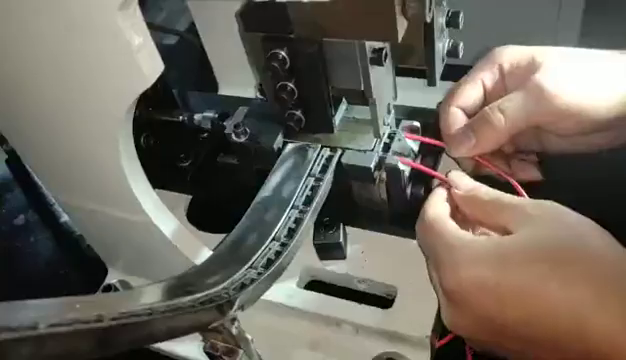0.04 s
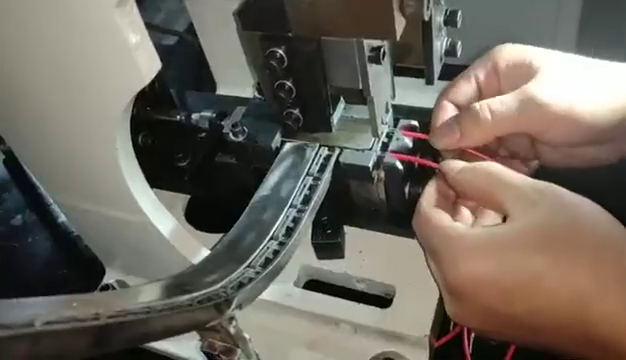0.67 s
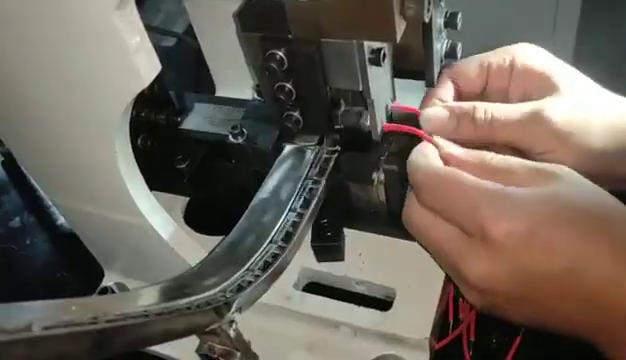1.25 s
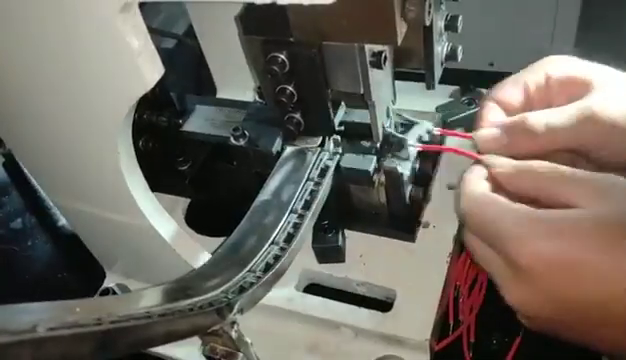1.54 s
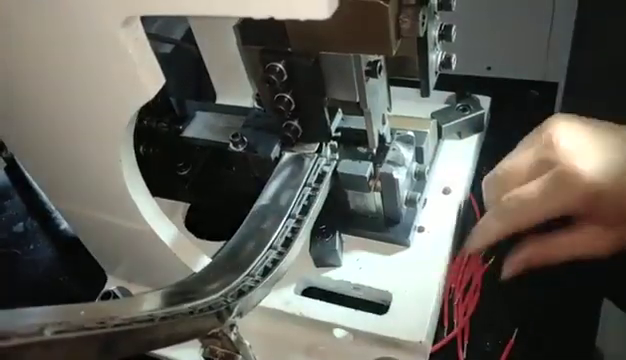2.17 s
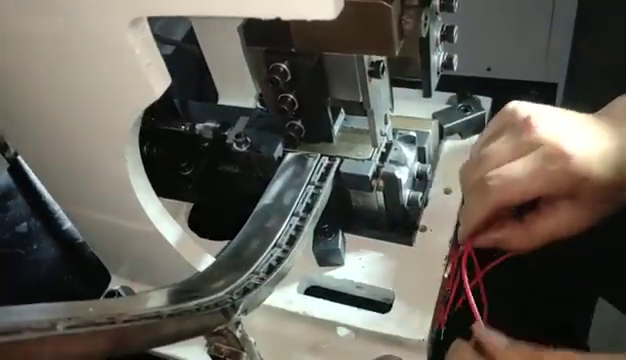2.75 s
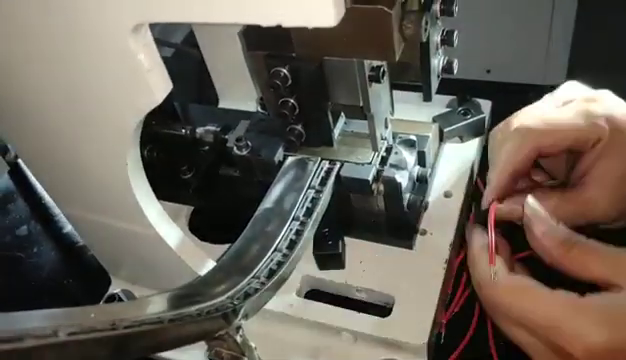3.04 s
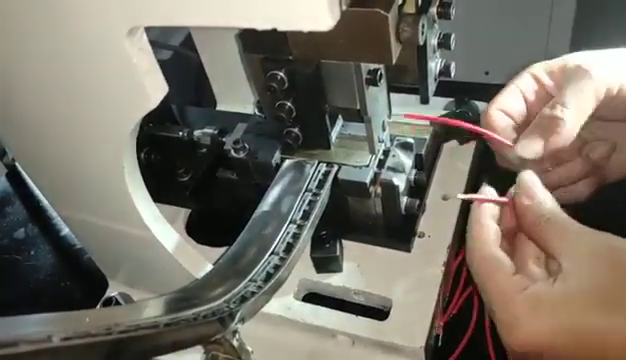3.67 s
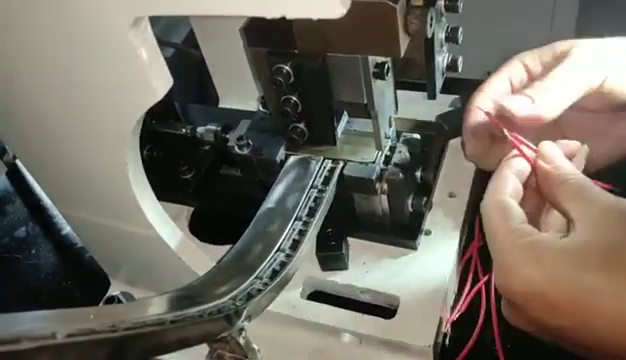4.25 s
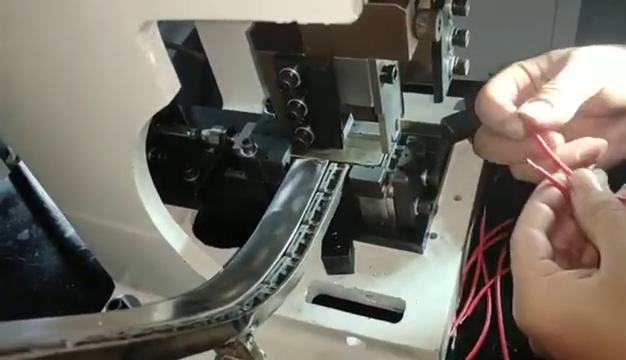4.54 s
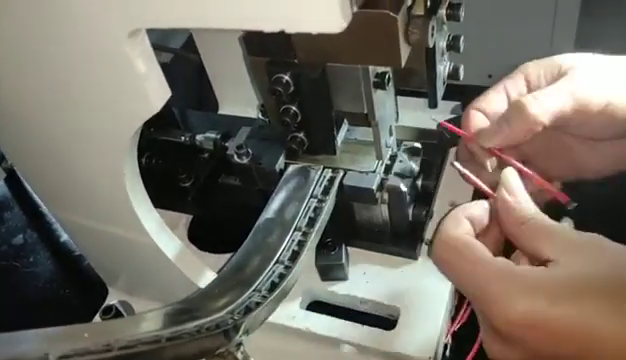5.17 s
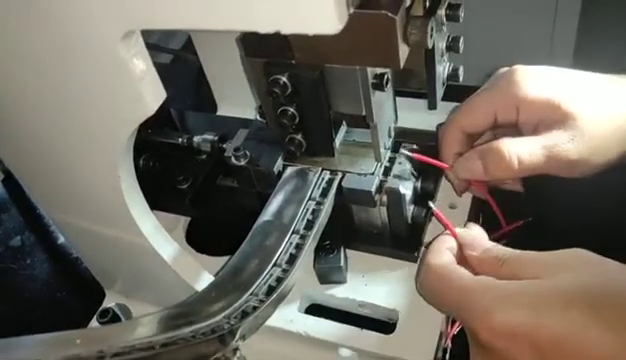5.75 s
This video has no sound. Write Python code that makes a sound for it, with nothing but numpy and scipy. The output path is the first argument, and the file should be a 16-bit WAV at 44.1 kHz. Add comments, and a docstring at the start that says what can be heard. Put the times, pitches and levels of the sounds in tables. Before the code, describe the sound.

Distant machines hum quietly in an echoing workshop. Close by, a little to the left, a wire crimping machine engages with a click and delivers one loud, ringing metal slam that chatters and settles. A smaller clack follows as the feed advances, and metal terminals scrape and jingle briefly along their guide. The rest is quiet: wires rub between fingers on the left, with a few light ticks.

```python
"""Crimping press in a workshop

Close by, left of the microphone, in a hard-walled shop: a clutch clicks in, the ram slams down and
chatters, steel slides rattle, the frame booms, a latch drops in. The feed clacks and drags a jingling
terminal strip. Then wires are handled, with faint ticks and swishes, over the hum of far machines."""
import sys
import numpy as np
from scipy import signal
from scipy.fft import rfft, irfft, next_fast_len
from scipy.io import wavfile
from scipy.ndimage import uniform_filter1d, minimum_filter1d

SR = 44100
rng = np.random.default_rng(int(sys.argv[2]) if len(sys.argv) > 2 else 0)


def store_pcm(level_fs):
    """Save levels as 16-bit WAV."""
    pcm = np.round(np.clip(level_fs, -1, 1) * 32767).astype(np.int16)
    wavfile.write(sys.argv[1], SR, np.atleast_2d(pcm).T)


N = 264732
TIME = np.arange(N) / SR

# stereo width at the microphone (frequency [Hz], side minus mid [dB])
STEREO_WIDTH = [(40, -2.5), (100, -17.5), (300, -9), (700, -3), (1500, -0.5), (3000, 0.5), (7500, -0.5)]
# decay of the room (frequency [Hz], t60 [s])
ROOM_DECAY = [(80, 2.7), (300, 0.61), (1000, 1.295), (3000, 0.72), (7500, 0.59)]
# wash of far machines (frequency [Hz], level [dB])
WASH_COLOUR = [(15, -45), (25, -6), (139, -2.5), (199, -5), (253, 0.5), (418, -5), (506, -12.5), (543, -12),
               (642, -7), (790, -19.5), (1050, -14), (2070, -23), (2330, -40.5), (2890, -42.5),
               (4130, -64.5), (7500, -26), (9750, -51.5), (16500, -120)]
# hums across the shop (frequency [Hz], level [dB], t60 [s])
SHOP_HUMS = [(260, -3.5, 0.97), (288, 1, 0.52), (350, -8.5, 0.36), (459, -2.5, 0.3), (503, -2.5, 0.58)]

# a wire slides through the fingers (time [s], hold [s], rub level [dB], hiss level [dB])
WIRE_RUBS = [(1.968, 0.1, -58.5, -53.5), (2.948, 0.0088, -59, -54.5), (3.054, 0.012, -55, -54.5),
             (3.161, 0.021, -54.5, -46), (3.381, 0.011, -60, -53.5), (3.566, 0.095, -79, -56),
             (3.812, 0.023, -81, -55), (3.954, 0.022, -61, -51.5), (4, 0.026, -51, -53.5),
             (4.477, 0.064, -57.5, -53.5), (4.65, 0.042, -71.5, -51.5), (4.75, 0.048, -59, -66),
             (5.134, 0.013, -51, -49), (5.17, 0.076, -50, -56.5), (5.507, 0.044, -59, -54),
             (5.592, 0.033, -55, -49)]
# soft rub of insulation (frequency [Hz], level [dB])
WIRE_RUB_COLOUR = [(500, -30.5), (1000, -1), (1500, -2), (1900, 3), (2300, 0), (2600, -0.5), (3000, -14.5),
                   (4000, -20.5), (7000, -15)]
# hiss of sliding insulation (frequency [Hz], level [dB])
WIRE_HISS_COLOUR = [(1500, -29), (2800, -3.5), (4000, -19), (5200, -7.5), (6600, 2.5), (7500, -2)]
# faint hiss of wires being held (frequency [Hz], level [dB])
HELD_WIRE_COLOUR = [(4200, -39), (5600, -10), (6600, 6.5), (7500, -1)]
# pawl, terminals and wire ends tick (time [s], level [dB], pitch [Hz], ring over click [dB])
METAL_TICKS = [(0.833, -35, 7780, -2), (0.8570, -37.5, 6320, -9), (0.9358, -32, 6370, 9.5),
               (0.943, -31, 6470, 8.5), (1.485, -57, 7950, 11), (1.4958, -36.5, 6730, 1),
               (1.509, -62, 8040, 8), (1.5702, -31.5, 4600, -0.5), (1.6011, -30, 1898, 11.5),
               (2.590, -31, 625, 10), (3.172, -42, 7750, -9.5), (3.1776, -43, 7860, -8),
               (3.18, -43.5, 2030, -5), (3.1937, -44, 3600, -3), (4.644, -50, 6500, 18),
               (5.046, -59.5, 7740, 10), (5.047, -62.5, 5320, 9), (5.1336, -54, 6430, 14)]
# dry click of a tick (frequency [Hz], level [dB])
CLICK_COLOUR = [(600, -25), (1400, 4), (2700, -14), (3600, -6), (4500, -4), (5500, -6), (6600, 8),
                (7400, 7.5), (7900, -31.5), (8600, -33)]

# terminals knock on their guide (time [s], level [dB])
TERMINAL_KNOCKS = [(2.403, -35), (2.4178, -25), (2.4215, -24), (2.4255, -23), (2.4314, -28.5), (2.459, -26),
                   (2.4690, -34), (2.5530, -41), (2.6147, -44)]
# crack of those knocks (frequency [Hz], level [dB])
CRACK_COLOUR = [(1000, -22.5), (2400, -1), (3300, 1), (4000, 2.5), (5200, -9), (7500, 3), (9000, -35.5)]
# ring of the terminals (frequency [Hz], level [dB], t60 [s])
TERMINAL_RING = [(1255, -11.5, 0.073), (1740, -21, 0.13), (2110, -13, .1), (2850, -2.5, 0.029),
                 (3290, -1.5, 0.047), (3520, -5, 0.054), (3740, -13, 0.055), (4450, -27, 0.064),
                 (4490, -17, 0.022), (5080, -12, 0.054), (6750, 4, 0.015), (7220, 9, 0.013),
                 (7425, -4, 0.069)]
# pulls on the terminal strip (time [s], level [dB], hold [s])
STRIP_PULLS = [(2.396, -34, .01), (2.418, -30, 0.012), (2.452, -27.5, 0.02), (2.542, -32, 0.021),
               (2.61, -32.5, 0.024)]
# strip scraping its guide (frequency [Hz], level [dB])
SCRAPE_COLOUR = [(80, -24.5), (125, -5.5), (185, 0), (260, -6.5), (360, -1), (480, -5.5), (633, -7),
                 (853, -8), (1070, -19), (1220, -11), (1700, -3), (1910, -14), (2300, -7), (2730, -2.5),
                 (3700, -11.5), (4570, -11), (7160, -1), (7500, -10.5), (9750, -47), (16500, -120)]
# blows of the feed (time [s], level [dB], thud boost [dB], edge boost [dB])
FEED_STRIKES = [(2.073, -35.5, 6, -13.5), (2.081, -33, 2.5, 7.5), (2.0912, -19.5, 7.5, -13.5),
                (2.0932, -16, -8.5, -8), (2.097, -16.5, -18, -3.5), (2.590, -41.5, 6.5, -15),
                (2.607, -42, 10.5, -18)]
# clack of the feed lever (frequency [Hz], level [dB])
LEVER_COLOUR = [(29, -49), (50, -16), (96, 11), (195, -16.5), (262, 4), (320, 1.5), (416, -5), (650, -5),
                (865, -9.5), (1000, -4.5), (1770, -5.5), (2980, -3.5), (3240, -6), (4000, -16),
                (6480, -3.5), (7500, -4.5), (9750, -42), (16500, -120)]
# ring of the feed (frequency [Hz], level [dB], t60 [s])
FEED_RING = [(88.6, -5.5, 0.61), (103.4, 2.5, 0.2), (277, 0.5, .11), (410, 10.5, 0.083), (988, -5.5, 0.17),
             (1270, 0, .14), (1637, -2, 0.32), (2027, -13.5, 0.35), (2570, -1, 0.18), (2690, -4, .2),
             (3370, 2.5, 0.16), (3680, -0.5, 0.16), (4330, -15.5, 0.284), (5930, 0, .16),
             (6700, -0.5, 0.16), (7000, -0.5, 0.2)]

# the latch strikes its stop (time [s], level [dB])
LATCH_STRIKES = [(1.39, -24.5), (1.3954, -22.5), (1.4002, -20), (1.409, -25.5), (1.4131, -25.5),
                 (1.4300, -28.5)]
# clatter of the latch (frequency [Hz], level [dB])
CLATTER_COLOUR = [(1000, -24), (2000, -4.5), (2700, 1), (3000, -17.5), (3300, -1.5), (4000, -7.5),
                  (4700, -3.5), (5700, -4.5), (6350, 7), (7500, 0), (9000, -40)]
# ring of the latch (frequency [Hz], level [dB], t60 [s])
LATCH_RING = [(2090, -12, 0.07), (2780, -6.5, 0.033), (2840, -14.5, 0.052), (3250, -6.5, 0.042),
              (3400, -12.5, 0.045), (3460, -11, 0.0429), (3900, -7, .03), (4990, -11, .06),
              (5190, -13, .06), (5724, -4.5, .05), (6480, -2.5, 0.02), (6690, 1, 0.029), (6990, 1.5, 0.029),
              (7450, -1.5, .024)]
# whirr of the gears (frequency [Hz], level [dB])
GEAR_COLOUR = [(100, -10), (190, 7.5), (300, -8), (480, -0.5), (620, 9.5), (820, 4.5), (1050, -5.5),
               (1400, -9), (2200, -11.5), (3500, -31), (5000, -39)]
# squeak of the ram's guide (frequency [Hz], level [dB])
GUIDE_COLOUR = [(1800, -25), (2500, -3.5), (3200, -15), (4500, -19.5), (5400, -11), (5800, -2.5),
                (6200, -4), (6650, 2.5), (7100, -5.5), (7500, -12)]

# blows of clutch, ram and linkage (time [s], level [dB], thud boost [dB], edge boost [dB])
RAM_STRIKES = [(0.8215, -34, -6, -24.5), (0.8841, -37.5, 4.5, -18), (0.9657, -18, -10.5, -15.5),
               (1.0031, -20, -3.5, -4.5), (1.0107, -1.5, -5, -5), (1.0265, -12, 6, -7.5),
               (1.0365, -18.5, 2.5, 2.5), (1.0478, -8, 8, 2.5), (1.0605, -13, 4.5, 0),
               (1.0705, -13.5, -7.5, 9.5), (1.0885, -28.5, -9.5, 11.5), (1.108, -25.5, -3, 8),
               (1.117, -21, 11.5, -8.5), (1.148, -23, -7, 6.5), (1.297, -29, 4, -12),
               (1.3603, -20, -6.5, -11.5), (1.372, -18.5, -17, -15.5), (1.397, -26, 3.5, -6),
               (1.412, -29, 0, -7)]
# slam of the ram (frequency [Hz], level [dB])
SLAM_COLOUR = [(29, -46), (50, -25), (187, -25), (222, -1.5), (316, -6), (398, -5), (502, -8), (813, -6.5),
               (922, -18.5), (1430, -11), (1590, -15), (2680, -23), (3180, -17.5), (4830, -23.5),
               (7500, -18.5), (9750, -48), (16500, -120)]
# rumble of the drive (frequency [Hz], level [dB])
RUMBLE_COLOUR = [(71, -33), (120, -5), (173, -5), (216, 7), (463, 0.5), (751, -14.5), (808, -7.5),
                 (883, -14.5), (1410, -13), (2320, -11), (2980, -16), (4000, -25.5), (5200, -49.5),
                 (8800, -120)]
# the slides go down, come up and settle (time [s], level [dB], hold [s], fall [dB/s])
SLIDE_RATTLES = [(1.016, -18.5, 0.036, 147.5), (1.077, -17.5, 0.076, 158), (1.315, -32.5, 0.031, 292),
                 (1.56, -42.5, 0.0061, 604), (1.646, -44.5, 0.01, 45.5)]
# rattle of the steel slides (frequency [Hz], level [dB])
RATTLE_COLOUR = [(880, -42.5), (1500, -16), (2710, 0), (3060, -7), (3420, 1.5), (3750, -8.5), (4190, -13),
                 (4400, 0), (4680, -9.5), (5080, 0.5), (5400, -5), (5730, -1), (7200, 6), (7500, 0.5),
                 (9750, -32), (16500, -120)]
# ring of the press (frequency [Hz], level [dB], t60 [s])
PRESS_RING = [(159.6, -9.5, .3), (226, 8, 0.44), (278, -7, 0.29), (336, -2.5, 0.27), (394.9, 12, 0.35),
              (449.3, 8, 0.28), (530, -3.5, 0.32), (625, 4.5, 0.41), (732, 1.5, 0.15), (818, 1.5, .4),
              (999, -9, 1), (1402, -12.5, 0.35), (1460, -6.5, 0.38), (1780, -6.5, .06), (2080, -12, 0.6),
              (2440, -12, 0.8), (2600, -13, 0.45), (3450, -5.5, 0.075), (3800, -0.5, 0.35), (4370, -1, .15),
              (4450, -5.5, .12), (4780, -3.5, 0.29), (5055, -3, .32), (5100, 0.5, .3), (5570, -8, 0.3),
              (5755, -3.5, .3), (5840, -5, 0.78), (6470, -10, 0.35), (6720, -9.5, 0.3), (7040, -3, .4),
              (6850, -2.5, 0.27), (7410, -9, 0.23)]
# sway of the frame on its bench (frequency [Hz], level [dB], t60 [s])
FRAME_SWAY = [(70.5, -0.5, 0.13), (119.5, 5, 0.41), (132.6, -8, 0.54)]
# clank of the anvil (frequency [Hz], level [dB], t60 [s])
ANVIL_RING = [(1460, 0, 0.0453), (1555, 1, .03), (1787, -3.5, .025), (2030, 2.5, 0.016), (2100, -1, 0.034),
              (2390, -4.5, .04)]

CLUTCH_S = RAM_STRIKES[0][0]   # the first blow is the clutch engaging
LANDING_S = max(RAM_STRIKES, key=lambda blow: blow[1])[0]   # the hardest is the ram on the anvil
TREBLE_END_HZ = 7540   # only the shrill ticks reach above this


def amp(db):
    """Decibels to gain."""
    return 10 ** (np.asarray(db) / 20)


def rms_one(x):
    """Scale to unit rms."""
    return x / np.sqrt(np.mean(x ** 2) + 1e-20)


def energy_one(x):
    """Scale a stereo response to unit energy a channel."""
    return x / np.sqrt(np.sum(x ** 2) / 2 + 1e-20)


def at_hz(points, hz):
    """Read a table on a log-frequency axis."""
    f, value = np.transpose(points)
    return np.interp(np.log(np.maximum(hz, 1)), np.log(f), value)


def pan(left_db):
    """Channel gains for a source louder by left_db on the microphone's left."""
    return amp(np.array([[left_db], [-left_db]]) / 2)


def cut(x, hz, kind, order=2):
    """Butterworth filter."""
    return signal.sosfilt(signal.butter(order, hz, kind, fs=SR, output="sos"), x + 1e-18)


def top_cut(x, hz):
    """Very steep stereo low-pass."""
    taps = signal.firwin(801, hz, window=("kaiser", 9), fs=SR)
    return signal.oaconvolve(x, taps[None], mode="same", axes=1)


def through(x, response):
    """Pass a signal through a stereo response."""
    return signal.oaconvolve(np.atleast_2d(x), response, axes=1)[:, :N]


def coloured(spectra, colour, size):
    """Colour a mid and a side spectrum and turn them into left and right signals."""
    hz = np.fft.rfftfreq(size, 1 / SR)
    mid, side = spectra * amp(at_hz(colour, hz))
    side = side * amp(at_hz(STEREO_WIDTH, hz))
    return irfft([mid + side, mid - side], size)


def noise(colour, size=N):
    """Coloured stereo noise, alike in the bass and unrelated in the treble; rms 1."""
    padded = next_fast_len(size, real=True)
    spectra = rfft(rng.standard_normal((2, padded)))
    return rms_one(coloured(spectra, colour, padded)[:, :size])


def body(colour, t60):
    """Response of a part with crowded, quickly damped modes that fill its colour evenly."""
    decay = amp(-60 * TIME[:SR // 2] / t60)
    spectra = rfft(rng.standard_normal((2, len(decay))) * np.sqrt(decay))
    for _ in range(3):
        flat = irfft(spectra / (np.abs(spectra) + 1e-9))
        spectra = rfft(flat * decay ** 0.25)
    return energy_one(coloured(spectra, colour, len(decay)) * decay ** 0.25)


def ringing(modes):
    """Response of a few distinct modes; the high ones reach the two channels out of step."""
    t, out = TIME[:SR], 0
    for hz, db, t60 in modes:
        phase = rng.uniform(-np.pi, np.pi, (2, 1)) * min(hz / 2000, 1) ** 1.5
        out = out + amp(db - 60 * t / t60) * np.sin(2 * np.pi * hz * t + phase)
    return energy_one(out)


def clicks(times, db):
    """One impulse a contact, carrying the energy of 10 ms at its level."""
    out = np.zeros(N)
    out[np.round(times * SR).astype(int)] = amp(db) * np.sqrt(SR / 100)
    return out


def blows(rows, thud_hz, edge_hz):
    """Contact forces: a heavy blow has more thud, a hard one more edge."""
    s, db, thud_db, edge_db = np.transpose(rows)
    thud = cut(clicks(s, db + thud_db), thud_hz, "low")
    middle = cut(clicks(s, db), [thud_hz, edge_hz], "band")
    edge = cut(clicks(s, db + edge_db), edge_hz, "high")
    return thud - middle + edge


def grit(per_s, spread_db):
    """Random tiny collisions of uneven size; rms 1."""
    contacts = rng.random(N) < per_s / SR
    sizes = amp(spread_db * np.clip(rng.standard_normal(N), -2, 2))
    return rms_one(contacts * sizes * rng.choice([-1, 1], N))


def stick_slip(per_s, spread_db):
    """Gain of a rubbing contact that catches and lets go at random moments."""
    grip = np.cumsum(rng.random(N) < per_s / SR)
    return rms_one(amp(spread_db * rng.uniform(-1, 1, N)[grip]))


def swell(s, db, hold_s, rise, fall):
    """Gain that climbs to its level at time s, holds and dies away; rise and fall in dB/s."""
    below_db = rise * np.maximum(s - TIME, 0) + fall * np.maximum(TIME - s - hold_s, 0)
    return amp(db - np.clip(below_db, 0, 150))


def together(swells):
    """Gain of overlapping movements: their powers add."""
    return np.sqrt(sum(gain ** 2 for gain in swells))


def far_machines():
    """Machines and fans far across the shop: a dull wash and wavering hums, swelling in at the start."""
    start_s, swell_s, swell_db = 0.073, 0.3, 11.5
    since = TIME - start_s
    level = (since > 0) * amp(-swell_db * np.exp(-since / swell_s))
    wash = amp(-51.5) * noise(WASH_COLOUR)
    hum = amp(-56.5) * rms_one(through(rng.standard_normal(N), ringing(SHOP_HUMS)))
    return level * (wash + hum) * pan(4.2)


def room_echo(x, build_s):
    """Diffuse echo off the hard walls, lingering longest in the bass."""
    t, tail = TIME[:2 * SR], 0
    white = noise([(20, 0), (20000, 0)], size=len(t))
    edges_hz = np.geomspace(40, 10000, 9)
    for low, high in zip(edges_hz, edges_hz[1:]):
        white = np.roll(white, SR // 5, axis=1)   # each band gets its own stretch of noise
        t60 = at_hz(ROOM_DECAY, np.sqrt(low * high))
        tail = tail + cut(white, [low, high], "band") * amp(-60 * t / t60)
    return through(x, energy_one(tail * (1 - np.exp(-t / build_s))))


def wires():
    """Well to the left, insulation rubs on skin and on other wires in tiny slips."""
    def movement(s, hold_s, db, fall):
        """Short movements start sharply, long ones gently."""
        return swell(s, db, hold_s, rise=10.5 / (0.99 * hold_s), fall=fall)
    in_hand = TIME > WIRE_RUBS[0][0]
    held = amp(-65.5) * in_hand * noise(HELD_WIRE_COLOUR) * pan(9.5)
    rub = together(movement(s, hold_s, db, fall=79.5) for s, hold_s, db, _ in WIRE_RUBS)
    hiss = together(movement(s, hold_s, db, fall=129.5) for s, hold_s, _, db in WIRE_RUBS)
    slips = grit(per_s=2500, spread_db=4) * stick_slip(per_s=70, spread_db=5)
    soft = amp(-0.5) * through(rub * slips, body(WIRE_RUB_COLOUR, t60=0.081)) * pan(8.9)
    bright = amp(-0.5) * through(hiss * slips, body(WIRE_HISS_COLOUR, t60=0.037)) * pan(15.4)
    return soft + bright + held


def ticks(shrill):
    """Small metal parts touch with a dry click and a brief ring; plays the shrill ones or the rest."""
    out = np.zeros((2, N + SR))
    click = body(CLICK_COLOUR, t60=0.05)
    size = click.shape[1]
    for s, db, hz, ring_db in METAL_TICKS:
        if (hz > TREBLE_END_HZ) != shrill:
            continue
        ring = ringing([(hz, 0, 0.028), (hz * 1.04, -3, 0.022), (hz, -5, 0.025)])[:, :size]
        tick = energy_one(click + amp(ring_db) * ring) * np.sqrt(SR / 200)
        left_db = 6.5 + 3.5 * np.log2(hz / 1000)   # higher rings lean further left
        start = round(s * SR)
        out[:, start:start + size] += amp(db) * pan(left_db) * tick
    return out[:, :N]


def terminals(drag):
    """Terminals crack against the guide and jingle as the strip drags them along."""
    knocks = clicks(*np.transpose(TERMINAL_KNOCKS))
    crack = through(knocks, body(CRACK_COLOUR, t60=0.061))
    jingle = through(knocks + amp(-4.5) * drag, ringing(TERMINAL_RING))
    return amp(-4.5) * (crack + jingle) * pan(6.3)


def feed():
    """The feed clacks over and shivers, then drags the terminal strip along its steel guide."""
    force = blows(FEED_STRIKES, thud_hz=843, edge_hz=3700)
    lever = body(LEVER_COLOUR, t60=0.11)
    clack = amp(-2) * through(force, lever) * pan(5.4)
    hardest_s = max(FEED_STRIKES, key=lambda blow: blow[1])[0]
    since = TIME - hardest_s   # loose parts rattle on after this blow
    shiver = amp(-27.5 - 60 * np.abs(since) / 0.88) * (since > 0) * grit(per_s=680, spread_db=-4.5)
    rattle = through(shiver, lever) * pan(5.1)
    pulling = together(swell(s, db, hold_s, rise=520.5, fall=301) for s, db, hold_s in STRIP_PULLS)
    drag = pulling * grit(per_s=1800, spread_db=3)
    scrape = amp(0.5) * through(drag, body(SCRAPE_COLOUR, t60=0.042)) * pan(6)
    ring = amp(-10) * through(force, ringing(FEED_RING)) * pan(11.4)
    return clack + rattle + scrape + ring + terminals(drag)


def latch():
    """At the top of the stroke the clutch latch drops in and chatters against its stop."""
    settling = swell(1.394, db=-24.5, hold_s=0.018, rise=700.5, fall=387.5)
    force = clicks(*np.transpose(LATCH_STRIKES)) + settling * grit(per_s=3000, spread_db=1)
    clatter = amp(-3.5) * through(force, body(CLATTER_COLOUR, t60=0.03))
    ring = amp(-3) * through(force, ringing(LATCH_RING))
    return (clatter + ring) * pan(5.9)


def run_up():
    """From clutch to landing the gears whirr and the ram squeaks in its guide, louder with speed."""
    moving = (TIME >= CLUTCH_S) & (TIME < LANDING_S)
    turning = swell(LANDING_S, db=-20, hold_s=0, rise=146, fall=0)
    meshing = moving * turning * grit(per_s=2500, spread_db=12.5)
    whirr = amp(-0.5) * through(meshing, body(GEAR_COLOUR, t60=0.11)) * pan(2.7)
    gliding = swell(LANDING_S, db=-29.5, hold_s=0, rise=92.5, fall=0)
    grabbing = swell(0.832, db=-34, hold_s=0.004, rise=1499, fall=332)
    friction = moving * together([gliding, grabbing]) * grit(per_s=4600, spread_db=5.5)
    squeak = amp(3) * through(friction, body(GUIDE_COLOUR, t60=0.0485)) * pan(2.3)
    return whirr + squeak


def frame_echo(x, db):
    """Treble bounces off the inside of the frame and reaches the microphone late, combing the sound."""
    lag = round(0.002273 * SR)
    delayed = np.pad(x, ((0, 0), (lag, 0)))[:, :N]
    return x + amp(db) * cut(delayed, 600, "high", order=1)


def ram():
    """Close up, the ram hits the anvil and chatters; the drive rumbles, slides rattle, the frame booms."""
    force = blows(RAM_STRIKES, thud_hz=840, edge_hz=2700)
    slam = amp(-1.5) * through(force, body(SLAM_COLOUR, t60=0.15)) * pan(1.1)

    load = swell(1.018, db=-17.5, hold_s=0.026, rise=552, fall=401.5)
    coast = swell(1.075, db=-20.5, hold_s=0.06, rise=502.5, fall=38.5)
    drive = together([load, coast]) * grit(per_s=5000, spread_db=1.5)
    rumble = amp(-3.5) * through(drive, body(RUMBLE_COLOUR, t60=0.036)) * pan(6.3)

    sliding = together(swell(s, db, hold_s, rise=651.5, fall=fall)
                       for s, db, hold_s, fall in SLIDE_RATTLES)
    chatter = sliding * grit(per_s=4600, spread_db=4) * stick_slip(per_s=150, spread_db=1)
    rattle = amp(0.5) * through(chatter, body(RATTLE_COLOUR, t60=0.05)) * pan(9.3)

    # crushing the terminal shakes the low modes, the slides the high ones
    strain = amp(3.5) * cut(load * grit(per_s=5400, spread_db=3), 950, "low")
    shaking = force + strain + amp(4.5) * cut(chatter, 1600, "high")
    ring = amp(-9) * through(shaking, ringing(PRESS_RING)) * pan(2.5)

    sway = rms_one(through(rng.standard_normal(N), ringing(FRAME_SWAY)))
    boom = amp(3) * swell(1.03, db=-34, hold_s=0.38, rise=200.5, fall=44.5) * sway * pan(3)
    clank = through(clicks(np.array([LANDING_S]), db=-5.5), ringing(ANVIL_RING)) * pan(1.3)
    return amp(-1.67) * frame_echo(slam + rattle, db=-12.5) + rumble + ring + clank + boom


def scene():
    """Press and hands near the microphone, the room's echo behind them, other machines far off."""
    press = cut(run_up() + ram() + latch() + feed(), 54, "high")
    near = press + wires() + ticks(shrill=False)
    shrill_ticks = ticks(shrill=True)
    echo = amp(-15) * room_echo(near + shrill_ticks, build_s=0.004)
    return top_cut(near + echo + far_machines(), TREBLE_END_HZ) + shrill_ticks


def record(dry):
    """After the microphone a fast limiter holds the peaks down and the top is cut steeply."""
    ceiling, window = 0.88, 221   # window in samples, 5 ms
    allowed = np.minimum(1, ceiling / (np.abs(dry).max(axis=0) + 1e-9))
    gain = uniform_filter1d(minimum_filter1d(allowed, size=window), size=window)
    return top_cut(dry * gain, hz=8700)


dry = scene()
out = record(dry)
store_pcm(out)
```